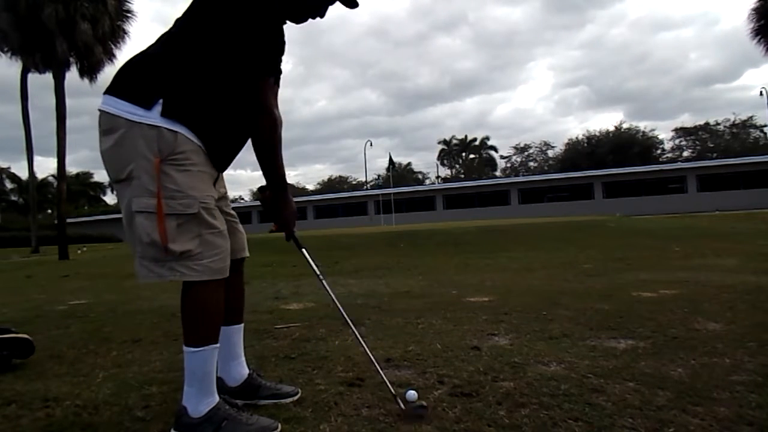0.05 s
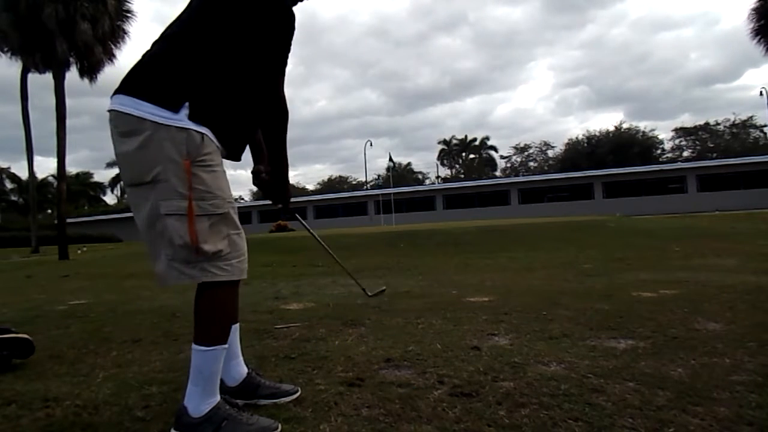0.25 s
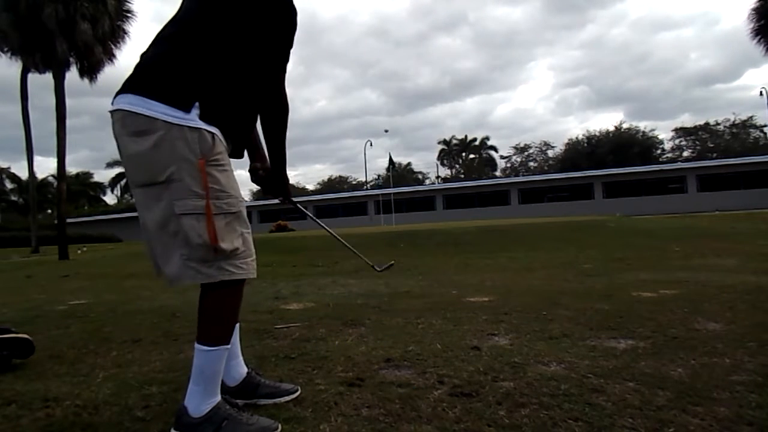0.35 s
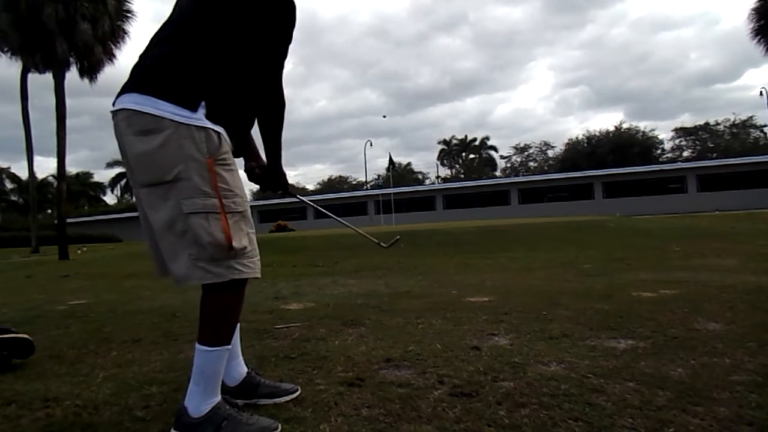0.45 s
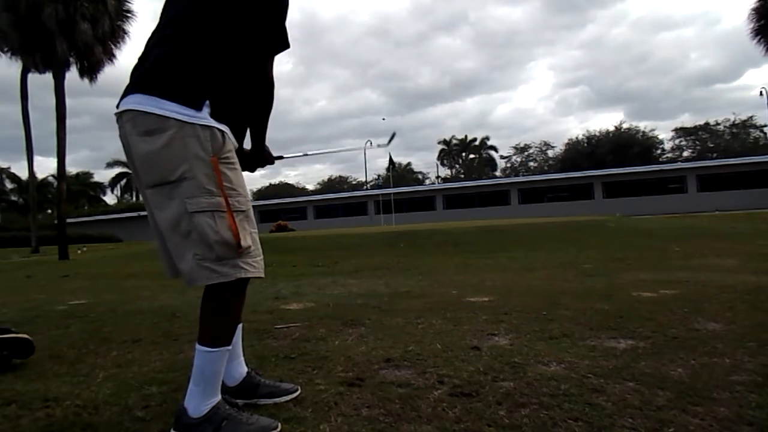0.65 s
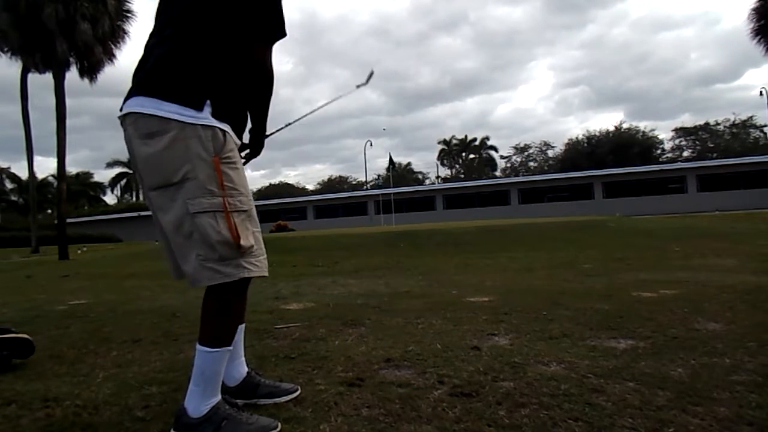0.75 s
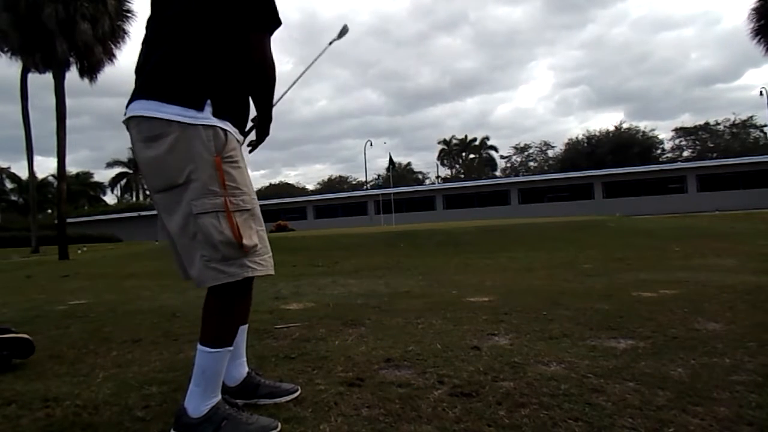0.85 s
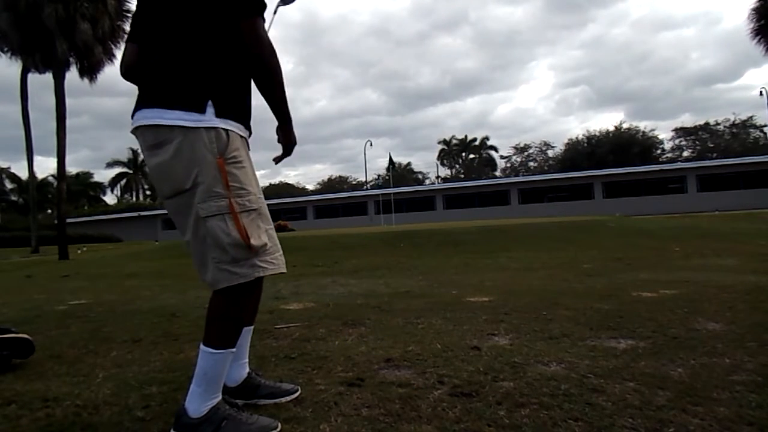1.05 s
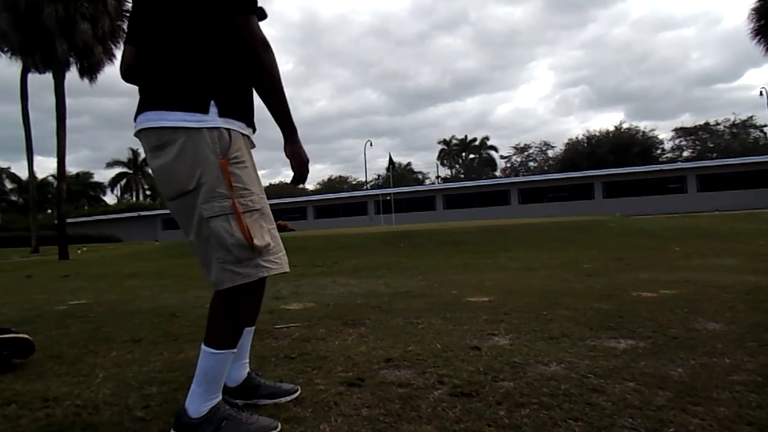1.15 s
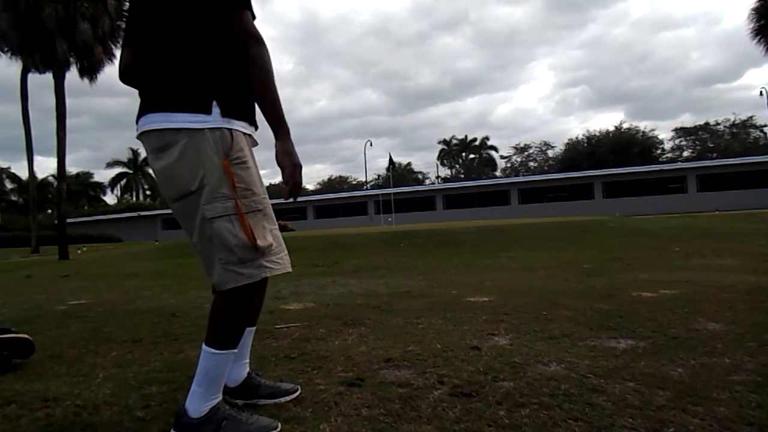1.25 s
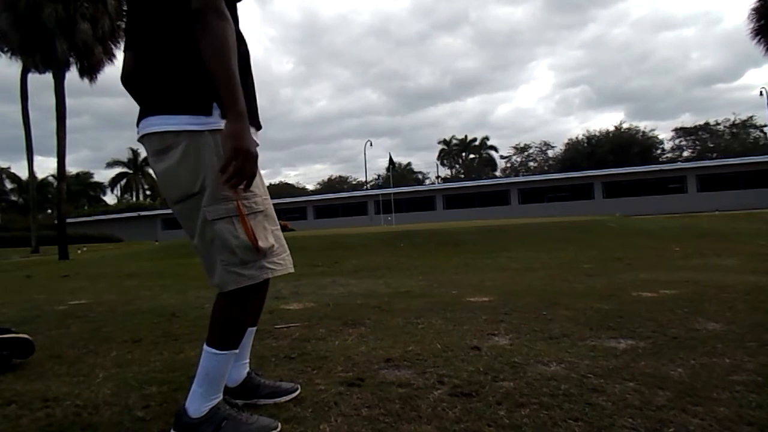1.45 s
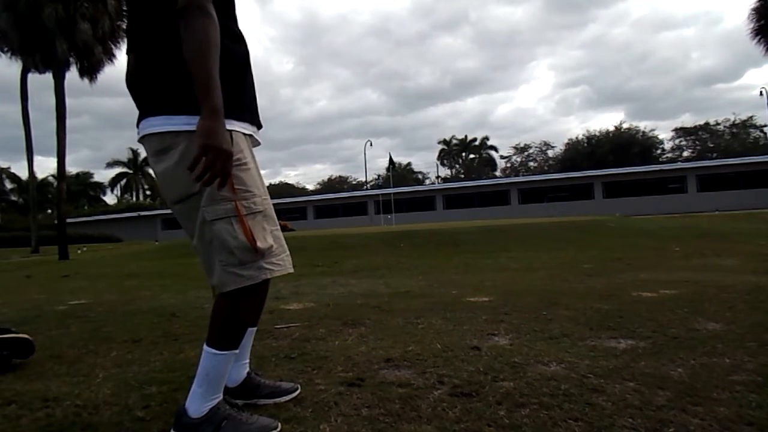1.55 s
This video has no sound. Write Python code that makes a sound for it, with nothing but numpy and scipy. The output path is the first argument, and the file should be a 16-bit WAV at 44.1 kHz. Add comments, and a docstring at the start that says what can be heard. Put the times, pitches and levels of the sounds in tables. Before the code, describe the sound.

A golf club clicks sharply against a ball, brushing grass, over faint outdoor traffic wash.

```python
"""A short golf chip on an open practice green: decaying sine modes and a noise crack make the click.
The iron brushes the grass before contact and sweeps on through the turf, as dense random snaps.
The surroundings scatter the click faintly, through decaying noise echoes and a tail.
Beneath lies a low wash of distant traffic and air, made of filtered noise."""
import sys
import numpy as np
from scipy import signal
from scipy.fft import rfft, irfft
from scipy.io import wavfile
from scipy.ndimage import uniform_filter1d

SR = 44100
rng = np.random.default_rng(int(sys.argv[2]) if len(sys.argv) > 2 else 0)


def persist_wave(psi):
    """Save psi, clipped to +-1, as 16-bit WAV."""
    counts = np.round(np.clip(psi, -1, 1) * 32767).astype(np.int16)
    wavfile.write(sys.argv[1], SR, np.atleast_2d(counts).T)


N = 70560  # 1.6 s


def amp(db):
    """Decibels to gain."""
    return 10 ** (np.asarray(db) / 20)


def unit(x):
    """Scales to rms 1."""
    return x / np.sqrt(np.mean(x ** 2) + 1e-20)


def read(points, hz):
    """Reads a spectrum table on a log-frequency axis."""
    point_hz, value = np.transpose(points)
    return np.interp(np.log(hz + 1), np.log(point_hz + 1), value)


def colour(x, points):
    """Filters a sound by a spectrum table."""
    gain = amp(read(points, np.fft.rfftfreq(N, 1 / SR)))
    return irfft(rfft(x) * gain, N)


def lowpass(x, edge_hz):
    """Steep low-pass, linear in phase."""
    taps = signal.firwin(401, edge_hz, window=("kaiser", 8), fs=SR)
    return signal.fftconvolve(x, taps, "same")


def since(start_s):
    """Seconds since start, zero before it."""
    return np.maximum(np.arange(N) / SR - start_s, 0)


def burst(start_s, rise_s, t60_s):
    """Envelope: a straight rise, then an exponential decay by 60 dB in t60_s."""
    rise = np.minimum(since(start_s) / rise_s, 1)
    decay = np.exp(-np.log(1000) * since(start_s + rise_s) / t60_s)
    return rise * decay


def strike():
    """Ball and club head ring briefly with a bright crack at contact; being small, they radiate little bass."""
    # ringing modes of ball and club head: pitch_hz, level_db (before the bass cut), t60_s
    modes = [(348, -31, 0.038), (613, -28, 0.016), (956, -22.5, 0.0088), (1222, -18, 0.011),
             (1623, -27.5, 0.02), (2028, -26, .013), (2277, -26, 0.0057), (2845, -33, 0.013),
             (4040, -20, .0145), (4230, -32.5, 0.014), (5910, -24, 0.0066), (7180, -31.5, 0.0075),
             (7980, -33, 0.0096)]
    # spectrum shape of the contact crack: frequency_hz, level_db_per_hz (relative)
    crack_spectrum = [(300, -25), (1500, 1), (3300, -1), (5000, -3.5), (7500, -6.5), (9200, 1),
                      (11000, 1.5), (12100, -6.5), (13200, -1.5), (15500, 3), (16500, -11)]
    hit_s, contact_s = 0.21466, 0.00085
    crack_db, crack_rise_s, crack_t60_s = -26, 0.00086, 0.0054
    low_cut_hz = 256

    t = since(hit_s)
    ring = np.zeros(N)
    for pitch_hz, level_db, t60_s in modes:
        ring += amp(level_db) * burst(hit_s, contact_s, t60_s) * np.sin(2 * np.pi * pitch_hz * t)

    crack_noise = unit(colour(rng.standard_normal(N), crack_spectrum))
    crack = amp(crack_db) * crack_noise * burst(hit_s, crack_rise_s, crack_t60_s)

    bass_cut = signal.butter(2, low_cut_hz / (SR / 2), "high", output="sos")
    return signal.sosfilt(bass_cut, ring + crack)


def grass():
    """Blades of grass snap densely under the sole of the club."""
    # strokes of the club through the grass: start_s, rise_s, t60_s, level_db
    brushes = [(0.202, 0.0048, 0.032, -46), (0.213, 0.0017, 0.099, -46), (0.245, .005, 0.067, -51),
               (.272, 0.0049, 0.11, -60)]
    # spectrum shape of the grass: frequency_hz, level_db_per_hz (relative)
    grass_spectrum = [(150, -17), (500, -8), (1500, 0.5), (3200, -5), (4200, 3.5), (5100, -6), (6200, -2.5),
                      (8500, -2), (10000, -0.5), (13500, -2), (15500, -6), (16100, -35)]
    blades_per_s, blade_spread_db = 9000, 4

    snapping = rng.standard_normal(N) * (rng.random(N) < blades_per_s / SR)
    snaps = snapping * amp(blade_spread_db * rng.standard_normal(N))
    envelope = sum(amp(level_db) * burst(start_s, rise_s, t60_s)
                   for start_s, rise_s, t60_s, level_db in brushes)
    return unit(colour(snaps, grass_spectrum)) * envelope


def surroundings(click):
    """The click returns as diffuse echoes and a faint outdoor tail, by convolution with decaying noise."""
    # echoes off the surroundings: delay_s, t60_s, level_db (before the colouring)
    echoes = [(.008, 0.041, -24.5), (.035, 0.075, -23.5), (0.063, 0.14, -28), (.169, .05, -32)]
    # colour of echoes and tail: frequency_hz, gain_db
    echo_colour = [(200, -26), (1200, -6.5), (3000, -13), (4200, -4), (5200, -7), (7000, -4), (15000, -8)]
    rise_s = 0.003
    tail = (0.01, 0.61, -28.5)  # same columns as the echoes

    scatter = rng.standard_normal(N)
    response = np.zeros(N)
    for delay_s, t60_s, level_db in [*echoes, tail]:
        shape = burst(delay_s, rise_s, t60_s)
        response += amp(level_db) * scatter * shape / np.linalg.norm(shape)
    return colour(signal.fftconvolve(click, response)[:N], echo_colour)


def air():
    """A steady wash of traffic and air, strongest in the bass, with slight drifting patches."""
    # spectrum shape of distant traffic and air: frequency_hz, level_db_per_hz (relative)
    air_spectrum = [(20, -20), (40, -13.5), (62, -6), (100, -6), (135, 3), (165, -4), (220, -1.5),
                    (260, -4.5), (300, -4.5), (380, -9.5), (640, -13), (880, -12.5), (1250, -15.5),
                    (1850, -16), (2300, -21), (2700, -21), (3200, -26), (5000, -30), (8000, -32.5),
                    (12000, -33), (15600, -36.5)]
    level_db, patchy_db, edge_hz = -53, 1, 15800

    bins = signal.stft(rng.standard_normal(N), nperseg=1024)[2]
    # smooth random gains over frequency, then time
    patches = uniform_filter1d(rng.standard_normal(bins.shape), size=8, axis=0)
    patches = unit(uniform_filter1d(patches, size=8, axis=1))
    wash = signal.istft(bins * amp(patchy_db * patches), nperseg=1024)[1][:N]
    return amp(level_db) * unit(lowpass(colour(wash, air_spectrum), edge_hz))


def scene():
    """The chip shot in the open air."""
    click = strike()
    return (click + surroundings(click) + grass() + air())[None]


def record(dry):
    """The recorder's band limit: a steep low-pass takes off the extreme treble."""
    return lowpass(dry[0], edge_hz=16700)[None]


dry = scene()
out = record(dry)
persist_wave(out)
```